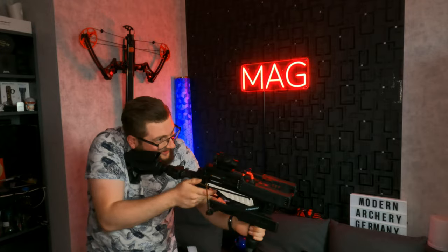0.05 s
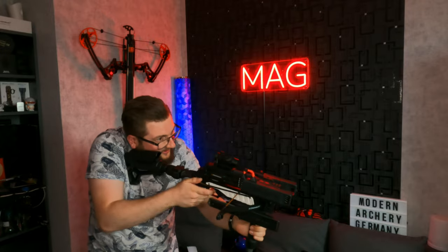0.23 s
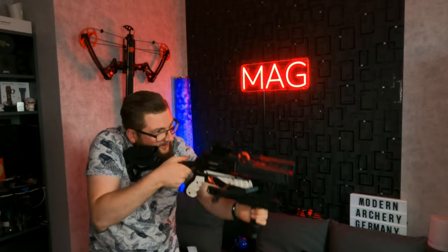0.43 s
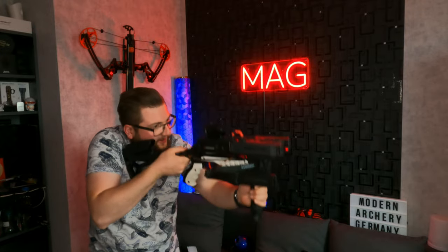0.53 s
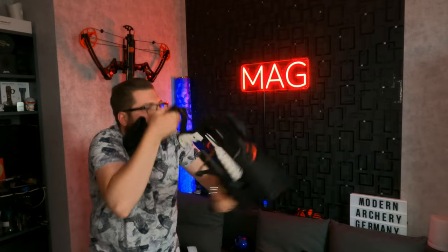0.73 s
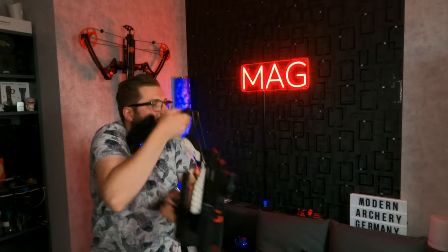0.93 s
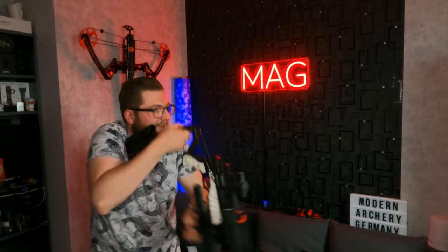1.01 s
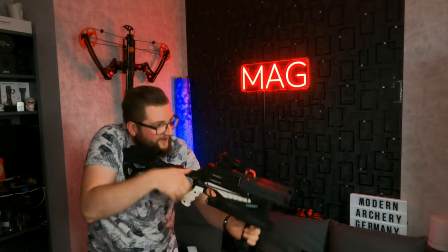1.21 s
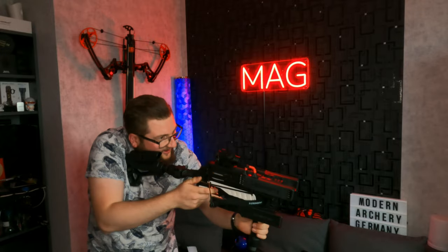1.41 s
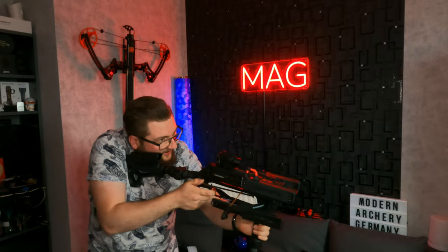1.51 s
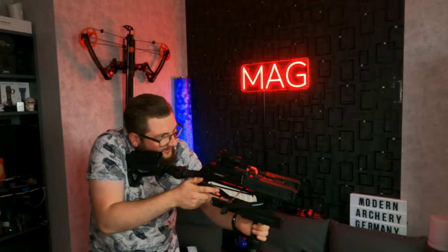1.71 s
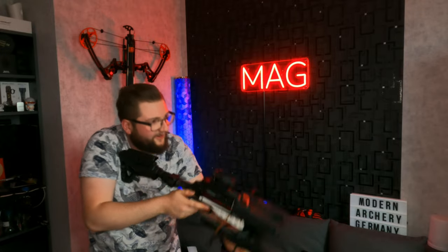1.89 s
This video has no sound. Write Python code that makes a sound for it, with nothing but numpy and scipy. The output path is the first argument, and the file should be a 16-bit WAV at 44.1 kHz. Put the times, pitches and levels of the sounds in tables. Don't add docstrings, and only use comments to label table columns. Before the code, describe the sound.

A repeating crossbow held close snaps off a shot, then a latch clicks, the lever slides and slams open, rattles back and locks, and a second shot cracks in a furnished room, picked up by a phone.

```python
import sys
import numpy as np
from scipy import signal
from scipy.fft import rfft, irfft
from scipy.io import wavfile
from scipy.ndimage import uniform_filter1d

SR = 44100
rng = np.random.default_rng(int(sys.argv[2]) if len(sys.argv) > 2 else 0)


def to_wav(s):
    ch = np.atleast_2d(s).T
    pcm = np.round(np.clip(ch, -1, 1) * 32767)
    wavfile.write(sys.argv[1], SR, pcm.astype(np.int16))


def nominal_scale(level):
    x = np.asarray(level, float) / 20
    return 10 ** x


N = 85995


def unit(x):
    return x / np.sqrt(np.mean(x ** 2) + 1e-18)


def curve(table, hz):
    table = np.array(table, float)
    return np.interp(np.log(np.maximum(hz, 1)), np.log(table[:, 0]), table[:, 1])


def colour(x, table):
    gain = nominal_scale(curve(table, np.fft.rfftfreq(len(x), 1 / SR)))
    return unit(irfft(rfft(x) * gain, len(x)))


def reson(x, hz, q):
    return signal.lfilter(*signal.iirpeak(min(hz, .45 * SR), q, fs=SR), x)


def add(out, s, x):
    i = max(int(s * SR), 0)
    out[i:i + len(x)] += x[:max(N - i, 0)]


def decay(t, t60_s):
    return np.exp(-np.log(1000) * t / t60_s)


def ring(hz, t60_s, size=N // 4):
    t = np.arange(size) / SR
    return np.sin(2 * np.pi * hz * t) * decay(t, t60_s)


def wobble(rate_hz, size):
    k = int(SR / rate_hz)
    return unit(uniform_filter1d(uniform_filter1d(rng.standard_normal(size), k), k))


def clacks(rows, chatter=1):
    rise_ms, click_q = .3, 1.33
    size = 2048
    out, t_ms = np.zeros(N), np.arange(size) / SR * 1000
    first_touch = 2.38 * (np.arange(size) == int(rise_ms * SR / 500))
    for (s, db, hz, ms), grit in zip(rows, rng.standard_normal((len(rows), size))):
        push = chatter * grit * (1 - np.exp(-t_ms / rise_ms)) * np.exp(-(t_ms / ms) ** 1.86)
        push = push + first_touch
        click = reson(reson(push, hz, click_q), hz, click_q)
        broad = signal.lfilter(*signal.butter(3, min(3.26 * hz, .45 * SR), fs=SR), push)
        crack = reson(push, 8000, 0.4)
        frame = reson(push, 930, 1.0)
        x = unit(click) + nominal_scale(-4) * unit(broad) + nominal_scale(-10.5) * unit(crack) + nominal_scale(-11) * unit(frame)
        if chatter:
            x = x / np.abs(x).max()
        else:
            x = unit(x) * np.sqrt(ms / 200)
        add(out, s, nominal_scale(db) * x)
    return out


def thumps(rows):
    out, t = np.zeros(N), np.arange(8192) / SR
    for s, db, hz, t60_s in rows:
        bend = 1 + 0.12 * np.exp(-t / 0.0074) + 0.1 * wobble(74, len(t))
        phase = 2 * np.pi * hz * np.cumsum(bend) / SR
        modes = np.sin(phase) + 0.33 * np.sin(1.425 * phase)
        add(out, s, nominal_scale(db) * modes * (1 - np.exp(-t * hz * 3)) * decay(t, t60_s))
    return out


def room(x):
    # (frequency [Hz], t60 [s])
    room_t60 = [(100, 0.24), (300, 0.4662), (800, 0.18), (1600, 0.36), (3500, 0.3836), (7000, 0.336),
                (14000, 0.11)]
    # (frequency [Hz], level [dB])
    room_colour = [(100, -2.5), (300, -7), (800, 3.5), (1600, 2), (3500, -13.5), (7000, -7.5), (14000, 0)]
    t = np.arange(N // 3) / SR
    tail = np.zeros(len(t))
    for hz in 80 * 2 ** np.arange(0, 7.7, .5):
        band = unit(reson(rng.standard_normal(len(t)), hz, 2.5)) * np.sqrt(hz)
        tail += nominal_scale(curve(room_colour, hz)) * band * decay(t, curve(room_t60, hz))
    tail = tail * (1 - np.exp(-t / 0.0034))
    return signal.fftconvolve(x, tail / np.sqrt(np.sum(tail ** 2)))[:N]


def room_floor():
    # (frequency [Hz], level [dB])
    floor_colour = [(30, -13), (100, -3), (233, -7.5), (700, -17), (2000, -21.5), (4400, -15), (8000, -8.5),
                    (16000, -18.5)]
    return nominal_scale(-66) * colour(rng.standard_normal(N), floor_colour)


def slide():
    # (time [s], level [dB], hiss of fast rubbing [dB], rumble of the grip [dB])
    effort = [(0, -40, 9, -9), (.19, -58, 3, 4), (.5, -65.5, -8, 5), (.61, -58, 11, 7),
              (.72, -53.5, 12, 15), (0.761, -29.5, 0, 1), (.81, -31.5, 6, 5), (.86, -26, -2, -7),
              (.94, -37.5, -1, 2), (1.0, -32.5, -7, -3), (1.078, -36.5, 9.5, 4), (1.17, -48.5, -4, -0.5),
              (1.212, -46.5, 3.5, 1.5), (1.289, -33, -33, 6), (1.3, -44, 15, 1), (1.42, -41.5, 9, -5.5),
              (1.571, -54.5, 4.5, 2), (1.95, -64.5, 11, 6.5)]
    # (frequency [Hz], level [dB])
    rub_colour = [(150, -41), (500, -6), (1200, 0.5), (1700, 0), (2200, -3.5), (3500, -5), (6500, -22.5),
                  (16000, -49.5)]
    hiss_colour = [(1500, -24.5), (5000, 1.5), (9000, -5.5), (16000, -15.5)]
    grip_colour = [(40, -7.5), (120, -3.5), (330, -6), (600, -11.5), (2000, -49.5)]
    grains_per_s, grain_spread_db = 4000, .8
    chance, size = rng.random((2, N))
    grains = (chance < grains_per_s / SR) * nominal_scale(-grain_spread_db * np.log(size + 1e-9))
    grains = grains * rng.standard_normal(N)
    rub = unit(grains) + rng.standard_normal(N)
    table = np.array(effort, float)
    t = np.arange(N) / SR
    db, hiss_db, grip_db = (np.interp(t, table[:, 0], col) for col in table.T[1:])
    x = colour(rub, rub_colour) * nominal_scale(4.1 * wobble(130, N))
    x = x + nominal_scale(hiss_db - 9.5) * colour(rng.standard_normal(N), hiss_colour)
    x = x + nominal_scale(grip_db - 3 + 2.0 * wobble(27, N)) * colour(rng.standard_normal(N), grip_colour)
    return nominal_scale(db) * x


def springs():
    # (frequency [Hz], level [dB], t60 [s])
    modes = [(8550, -14, .2), (11085, -8, .25), (11413, -7, .25), (13910, -4, .3), (14422, 0, .33)]
    # (time [s], level [dB])
    hits = [
        (0, -45),
        (0.254, -50.5),
        (.895, -56),
        (1.426, -49),
        (1.675, -51.5),
    ]
    out = np.zeros(N)
    for (s, db), share in zip(hits, rng.standard_normal((len(hits), len(modes)))):
        for (hz, mode_db, t60_s), c in zip(modes, share):
            uneven = 1 + 0.44 * wobble(60, N // 4)
            add(out, s, nominal_scale(db + mode_db + 1.5 * c) * ring(hz, t60_s) * uneven)
    return out


def knocks():
    # (time [s], level [dB], frequency [Hz], ring t60 [ms], bright tick [dB])
    rows = [(.529, -23.5, 1150, 14, -7.5), (.5355, -25, 1200, 12, -6), (.5395, -31, 1150, 25, -17.5),
            (.6286, 0.5, 4800, 7.3, -22), (.753, -23, 1290, 20, -24), (.769, -16, 4730, 15, -28.5),
            (.7835, -18.5, 1730, 36, -21.5), (.7925, -11.5, 1640, 33, -16), (.801, -21, 1660, 16, -27.5),
            (.604, -24.5, 2650, 14, -22), (.8265, -9.5, 2720, 21, -23.5), (.832, -18.5, 2320, 17, -18),
            (.8385, -19, 2880, 12, -13.5), (.853, -19, 1400, 16, -22.5), (.862, -27, 2760, 14, -17.5),
            (.869, -17, 1790, 14, -21), (.877, -19.5, 1270, 25, -25), (.892, -27, 2000, 17, -22),
            (.917, -26, 1280, 18, -18), (.998, -19.5, 1470, 22, -16), (1.008, -26, 1910, 21, -19),
            (1.036, -35, 1790, 14, -17), (1.0525, -14, 3540, 9.9, -13.5), (1.0905, -16.5, 5460, 5.3, -15),
            (1.204, -30, 1500, 37, -24.5), (1.217, -29, 1160, 28, -22.5), (1.2375, -29.5, 1040, 23, -19),
            (1.2505, -23, 1040, 20, -24), (1.269, -32, 1500, 24, -21), (1.2815, -28.5, 1330, 33, -19.5),
            (1.326, -11, 1370, 4.4, -18.5), (1.344, -19, 1230, 15, -24.5), (1.4475, -22.5, 1350, 15, -17),
            (1.453, -21, 756, 9.6, -18), (1.4585, -23.5, 655, 14, -18), (1.4625, -20, 600, 12, -21.5),
            (1.4532, -22.5, 2660, 11, -20), (1.4585, -25.5, 2630, 11, -21), (1.659, -20.5, 1820, 24, -18),
            (1.3205, -15.5, 1000, 9.8, -18.5)]
    spread = 0.15
    out = np.zeros(N)
    for (s, db, hz, ms, tick_db), c in zip(rows, rng.standard_normal((len(rows), 128))):
        detune = (0, np.tanh(c[0]), np.tanh(c[1]))
        x = sum(ring(hz * (1 + spread * d), ms / 1000, size=2048) for d in detune) / 2
        x[:128] += 3 * nominal_scale(tick_db) * reson(c * np.exp(-np.arange(128) / 31.0), 4500, .6)
        add(out, s, nominal_scale(db) * x * (1 - np.exp(-np.arange(2048) / 6.4)))
    return out


def mechanism():
    # (time [s], level [dB], centre [Hz], length [ms])
    stops = [(.6265, -7, 2000, 2.5), (.6278, 4, 2980, 1.97), (.7685, -7, 1550, 5.4), (.775, -12, 1620, 2.3),
             (.8208, -11.5, 1670, 1.6), (.8258, -1, 2410, 5.1), (.838, -23, 3000, 3.8),
             (.951, 3.5, 6400, 1.3), (.954, 1, 2980, 5.7), (.9555, -0.5, 6000, 4.1), (.964, 4, 8000, 1.4),
             (.9675, -5, 8000, 0.93), (1.0502, -5.5, 4940, 1.6), (1.0525, -16, 5000, 1.3),
             (1.0835, -8.5, 3850, 2.8), (1.086, -5.5, 6400, 0.89), (1.0905, -8.5, 1540, 0.83),
             (1.0925, -15, 2000, 2.8), (1.2893, -11, 1300, 0.86), (1.304, -9, 2180, 3.7),
             (1.312, 6.5, 1210, 4.2), (1.3122, 6.5, 2900, 3.16), (1.3165, -0.5, 7240, 2.4),
             (1.325, -8.5, 5150, 4.1), (1.34, -12.5, 5000, 2.2), (1.345, -12, 6160, 3.4)]
    # (time [s], level [dB], centre [Hz], length [ms])
    ticks = [(.0345, -16, 5710, 2), (.108, -27.5, 3770, 1.7), (.136, -30, 2000, 11),
             (.372, -28.5, 3190, 5.2), (.5255, -39.5, 5000, 2.1), (1.081, -12.5, 2540, 1.5),
             (1.0495, -15, 1399, 1.7), (.809, -26, 1640, 3), (.793, -36, 1720, 4), (.8725, -7, 5460, 0.93),
             (.895, -26, 7700, 3), (.929, -27.5, 4060, 2.5), (.9995, -8, 5540, 1.5),
             (1.107, -33, 2870, 1.8), (1.125, -34, 2440, 2), (1.129, -25, 1920, 3.5),
             (1.1435, -52, 2980, 1.5), (1.1575, -24, 5100, 1.7), (1.198, -29, 1000, 6.7),
             (1.251, -34, 3120, 2.2), (1.4262, -19.5, 2900, 1.6), (1.474, -29, 3580, 2.9),
             (1.279, -30, 5000, 8), (1.464, -27.5, 4500, 1.9), (1.488, -29.5, 2210, 2.5),
             (1.511, -30, 2400, 1.8), (1.743, -28, 4300, 5.8)]
    # (time [s], level [dB], frequency [Hz], t60 [s])
    blows = [(.065, -28.5, 262, 0.059), (.525, -39, 237, 0.071), (.625, -16, 125, 0.031),
             (.634, -14, 194.4, 0.043), (.782, -14.5, 120, 0.064), (.875, -19.5, 322, 0.051),
             (.9515, 6, 330, 0.044), (.952, -1, 105, 0.061), (.964, -10, 266, 0.067),
             (1.02, -25, 305, 0.056), (1.062, -15.5, 120, 0.059), (1.255, -21, 177, 0.068),
             (1.312, 7.5, 176, 0.025), (1.313, -9.5, 100, 0.048), (1.325, -13.5, 342, 0.037),
             (1.466, -22.5, 450, 0.024), (1.45, -22, 250, 0.06)]
    return clacks(stops) + clacks(ticks), thumps(blows), clacks(stops, 0) + clacks(ticks, 0)


def shots():
    # (time [s], level [dB])
    releases = [
        (0.2014, -1),
        (1.5893, -0.5),
    ]
    # (delay [s], level [dB], centre [Hz], length [ms])
    contacts = [
        (0, 6, 2000, 4),
        (.0062, 5.5, 3570, 8.5),
        (.0105, -4.5, 2590, 3.9),
        (.0135, -3, 4950, 2.2),
        (.019, -2.5, 1667, 3),
    ]
    # (delay [s], level [dB], frequency [Hz], t60 [s])
    kicks = [
        (.002, -7.5, 81.5, 0.036),
        (.002, -2, 127, 0.062),
        (.006, -5.5, 216, 0.041),
        (.073, -9, 225, 0.039),
        (.112, -29.5, 200, .05),
    ]
    # (frequency [Hz], level [dB], t60 [s])
    limbs = [(675, -5, 0.08), (1488, -10.5, 0.21), (1617, -13, 0.099), (1874, -5, 0.028),
             (2000, -7.5, 0.05)]

    def at_shots(rows):
        return [(s + delay, db + gain, a, b) for s, db in releases for delay, gain, a, b in rows]

    slap, bare = clacks(at_shots(contacts)), clacks(at_shots(contacts), 0)
    rung = np.zeros(N)
    for hz, db, t60_s in limbs:
        mode = signal.fftconvolve(bare, ring(hz, t60_s))[:N]
        rung += nominal_scale(db) * mode * (1 + 0.69 * wobble(150, N))
    return slap + nominal_scale(-2) * rung / np.abs(rung).max(), thumps(at_shots(kicks)), bare


def scene():
    slap, kick, bare_shots = shots()
    parts, blows, bare_parts = mechanism()
    rattle = knocks()
    wet = room(nominal_scale(-12) * (bare_shots + kick) + nominal_scale(-23.5) * (bare_parts + blows))
    wet = wet + nominal_scale(-29.5) * room(rattle)
    steady = room_floor() + slide() + springs()
    return (steady + rattle + parts + blows + slap + kick + wet)[None]


def low_pass(x):
    return signal.sosfilt(signal.butter(12, 16480, fs=SR, output="sos"), x)


def record(dry):
    fade_start_s, fade_len_s = 1.9, .05
    low_cut_hz, top_hz, drive, gain = 40, 15800, 1.132, 0.96
    fade = nominal_scale(-16 * np.clip((np.arange(N) / SR - fade_start_s) / fade_len_s, 0, 1))
    x = signal.sosfilt(signal.butter(3, low_cut_hz, "high", fs=SR, output="sos"), dry)
    x = np.tanh(drive * x) * fade
    x = signal.sosfilt(signal.ellip(8, .2, 70, top_hz, fs=SR, output="sos"), x)
    return low_pass(np.clip(gain * x, -1, 1))


dry = scene()
out = record(dry)
to_wav(out)
```